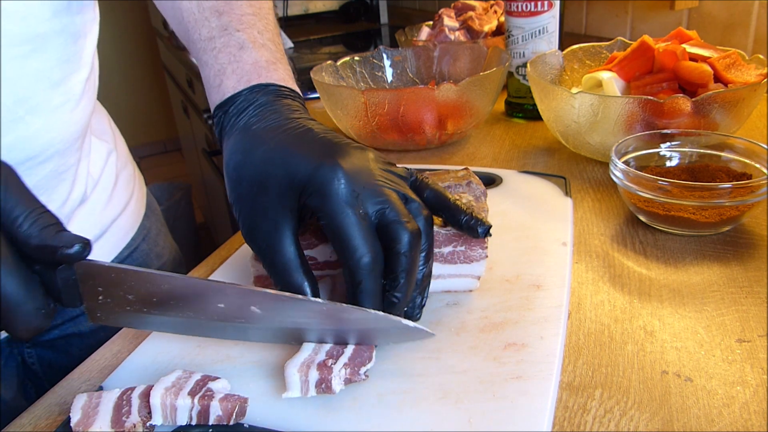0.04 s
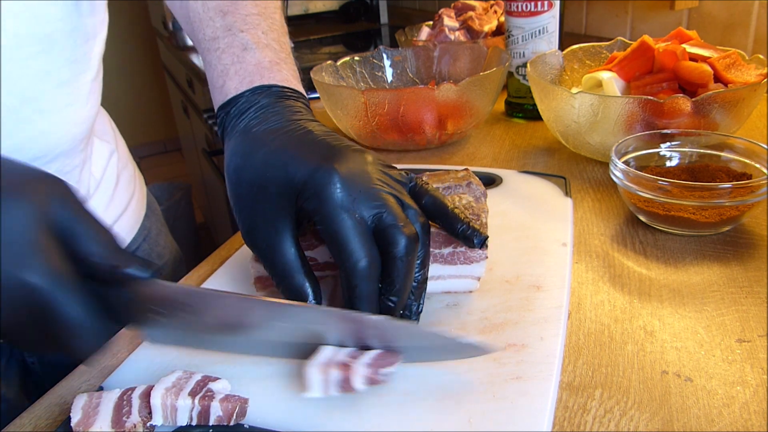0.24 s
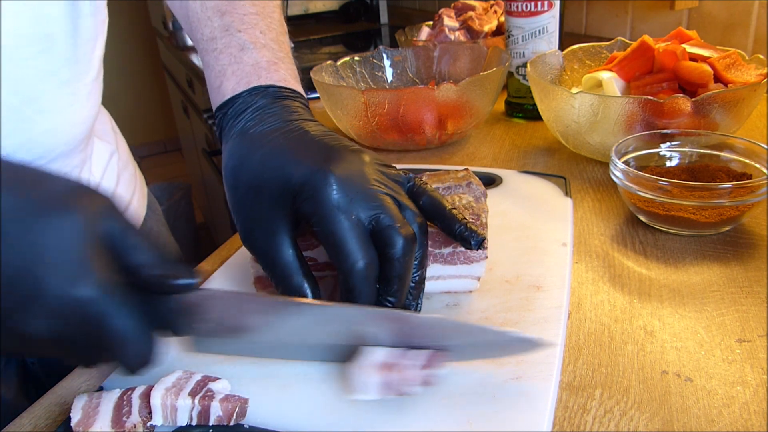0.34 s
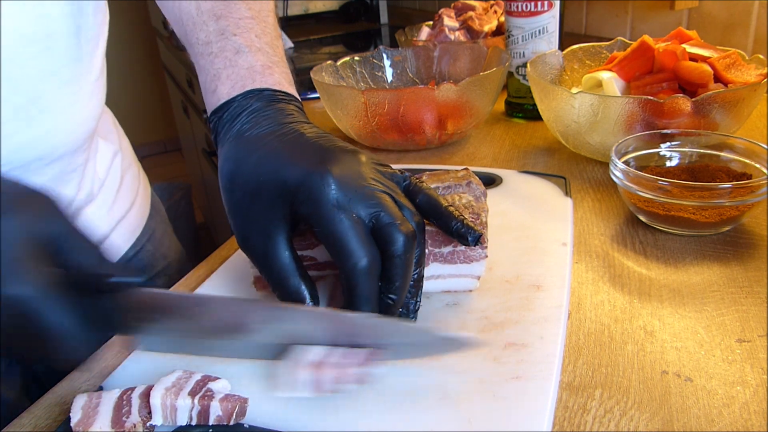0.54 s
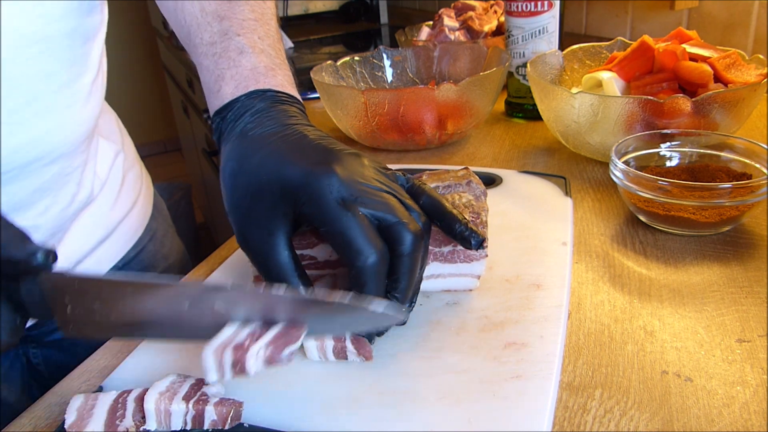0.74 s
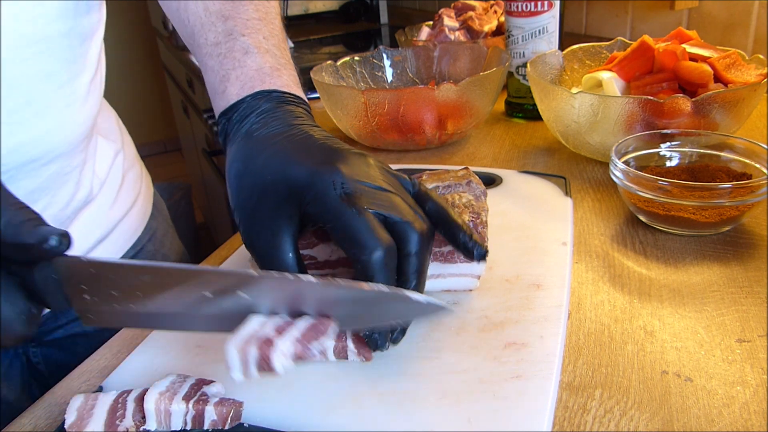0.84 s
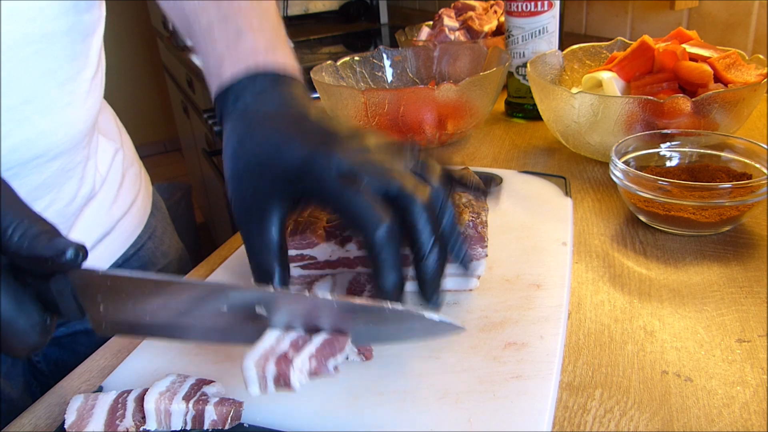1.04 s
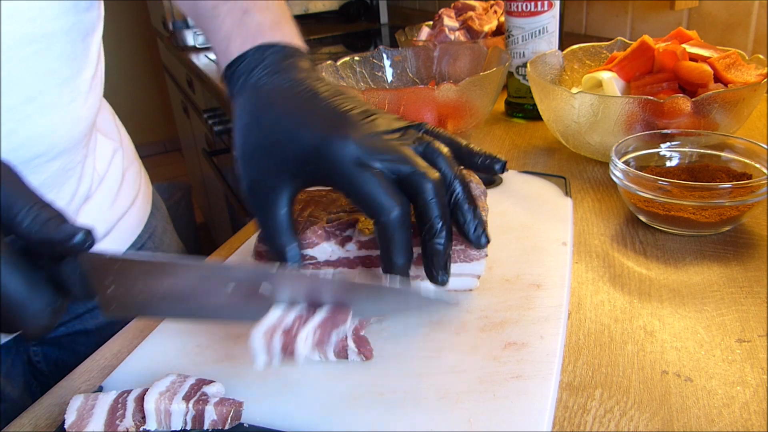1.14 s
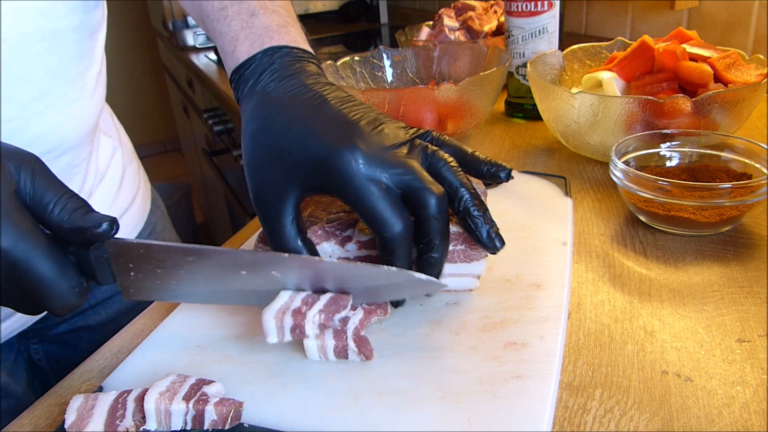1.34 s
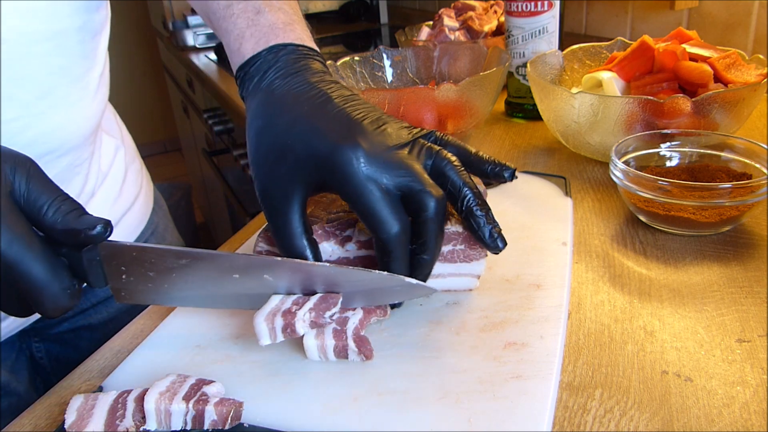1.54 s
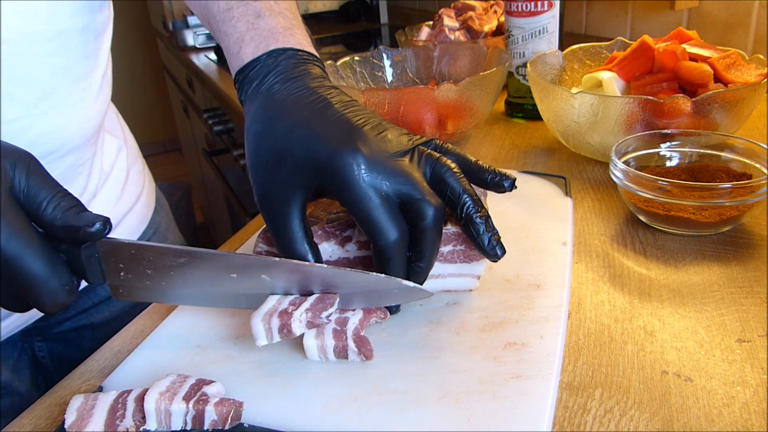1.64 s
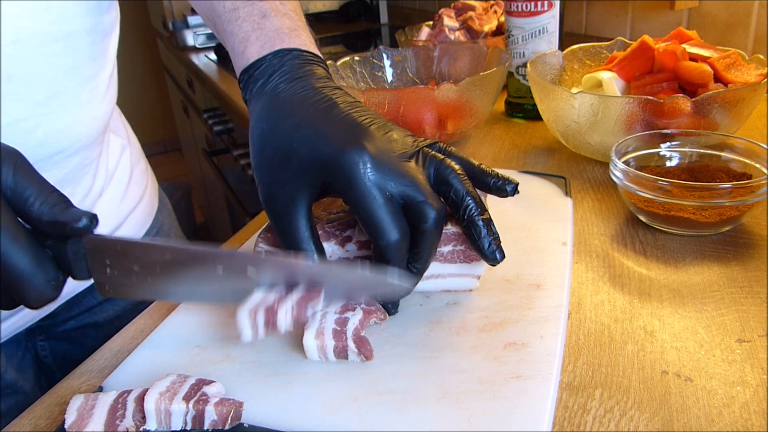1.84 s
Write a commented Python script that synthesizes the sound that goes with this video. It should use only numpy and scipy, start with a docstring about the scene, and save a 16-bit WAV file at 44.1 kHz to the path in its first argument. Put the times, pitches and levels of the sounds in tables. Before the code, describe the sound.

A knife rasps through bacon against a plastic cutting board, one push and one pull.

```python
"""A long knife rasps through a slab of bacon on a plastic cutting board: one push, one pull back.
The edge slips on the board in tiny grains that set board and blade ringing, with short squeaks
and a thin gliding whistle. The slice comes away with sticky ticks, then blade and gloved fingers
shift softly on the meat. Behind it all a refrigerator buzzes in the hush of a small kitchen."""
import sys
import numpy as np
from scipy import signal
from scipy.fft import rfft, irfft, next_fast_len
from scipy.io import wavfile

SR = 44100
rng = np.random.default_rng(int(sys.argv[2]) if len(sys.argv) > 2 else 0)


def digitize_waveform(pressure):
    """Quantize a signal to 16-bit integers and store it at the path in sys.argv[1].

    Rows of a 2-D input are taken as channels; values are limited to [-1, 1].
    """
    field = np.atleast_2d(pressure).T
    bounded = np.clip(field, -1, 1)
    quanta = np.round(bounded * 32767).astype(np.int16)
    wavfile.write(sys.argv[1], SR, quanta)


N = 83790
T = np.arange(N) / SR


def knife():
    """The cut, placed in the room: rasping strokes with the catches, ring and whistles of the edge."""
    cutting = push_and_pull() + catches() + blade_ring() + whistles()
    return kitchen(cutting, near_db=-2.5, room_db=-6)


# envelopes of the two strokes; each band rides on the overall level, ahead of its trim:
# (time [s], level [dB], bass offset [dB], low-mid offset [dB], treble offset [dB])
PUSH_ENVELOPE = [(0.15, -62, -17, -14, -11), (0.17, -66.5, -15, -12, 6.5), (0.232, -54, -7.5, 8, -1.5),
                 (0.342, -37, -11, -2.5, -8), (0.362, -40, -17.5, -5.5, -8.5),
                 (0.44, -38.5, -23.5, -5.5, -7), (0.476, -41.5, -23.5, -2, -13.5), (0.502, -58.5, 0, 2, 1),
                 (0.52, -60, -19, -10, 3)]
PULL_ENVELOPE = [(0.51, -64, -3, -16, -11), (0.53, -49, -5, -26, -7.5), (0.572, -40, -26, -11.5, -5.5),
                 (0.6, -36.5, -20, -10, -5.5), (0.638, -37.5, -22, -6, -5), (0.696, -39, -30, -10, -10),
                 (0.726, -44.5, -14, -1.5, -9.5), (0.78, -63, 1, -3, -0.5), (0.8, -62, -7, -3, -15)]
# EQ of each stroke's rasp and hiss: (frequency [Hz], gain [dB])
PUSH_RASP_EQ = [(650, -45), (1100, -6.5), (1550, 3), (2000, 0.5), (2400, 0), (3200, -4), (3900, -3.5),
                (5700, -7), (8100, -13), (11000, -19), (13000, -22.5), (15000, -38)]
PULL_RASP_EQ = [(650, -24), (1100, -8), (1800, -2), (2150, -7), (2500, -5), (3300, -8), (4200, -6.5),
                (6400, -13), (8400, -14), (11000, -19.5), (13000, -26), (15000, -50)]
# EQ of each stroke's low-mid body: (frequency [Hz], gain [dB])
PUSH_BODY_EQ = [(330, -32.5), (520, -7.5), (690, -6), (830, -9), (1150, -8), (1600, -16.5)]
PULL_BODY_EQ = [(330, -19), (520, -0.5), (680, -7.5), (900, 1), (1100, 0), (1600, -20)]

def push_and_pull():
    """The edge scrapes forward over the board, then back, each way with its own tone and band trims."""
    push = stroke(PUSH_ENVELOPE, PUSH_RASP_EQ, PUSH_BODY_EQ,
                  rasp_db=-1.5, bass_db=-1, body_db=-9, hiss_db=-0.05)
    pull = stroke(PULL_ENVELOPE, PULL_RASP_EQ, PULL_BODY_EQ,
                  rasp_db=0.45, bass_db=-10, body_db=-1.9, hiss_db=-0.6)
    return push + pull


# EQ of the low end of both strokes: (frequency [Hz], gain [dB])
STROKE_BASS_EQ = [(60, -36), (170, -1.5), (280, 3.5), (400, -6.5), (520, 4), (750, -34)]

def stroke(envelope, rasp_eq, body_eq, rasp_db, bass_db, body_db, hiss_db):
    """One pass of the knife in four bands: the lows stand for pressure, the treble for speed."""
    crossover_hz = 6500
    level, lows, mids, treble = in_time(envelope)
    scrape = cut(colour(slipping(), rasp_eq), 1080, "high")
    rasp = from_db(rasp_db) * rms_one(cut(scrape, crossover_hz, "low"))
    sharpest_slips = colour(board_and_blade(grains(per_s=5000, spread_db=0.5)), rasp_eq)
    hiss = from_db(treble + hiss_db) * rms_one(cut(sharpest_slips, crossover_hz, "high"))
    bass = from_db(lows + bass_db) * rms_one(cut(colour(slipping(), STROKE_BASS_EQ), 820, "low"))
    body = from_db(mids + body_db) * rms_one(cut(colour(slipping(), body_eq), 1470, "low"))
    return gate(envelope) * from_db(level) * (rasp + hiss + bass + body)


SLIPS_PER_S, SLIP_SPREAD_DB = 9000, 3

def slipping():
    """The edge slips over the board in dense grains that set board and blade ringing."""
    slips = grains(SLIPS_PER_S, SLIP_SPREAD_DB)
    judder_db = 0.03 * drift(rate_hz=87)
    return board_and_blade(slips * from_db(judder_db))


# resonances of board and blade: (frequency [Hz], width [Hz], gain [dB])
CONTACT_MODES = [(333, 15, 3.5), (689, 32, 10.5), (928, 14, 10), (1042, 22, 4.5), (1170, 35, 7),
                 (1426, 19, 8), (1540, 21, 4.5), (1795, 40, 0), (1752, 19, 9), (2020, 21, -2.5),
                 (2359, 24, 6.5), (2640, 13, 10), (3010, 15, 7.5), (3894, 290, 4), (4634, 15, 7.5),
                 (5830, 13, -12), (8360, 81, -7), (10500, 380, 3.5)]

def board_and_blade(drive):
    """Board and blade lend their resonances to what happens at the edge."""
    return resonate(drive, CONTACT_MODES)


# snags of the edge: (time [s], relative level [dB])
CATCH_HITS = [(0.2555, -17), (0.3390, -19.5), (0.3842, -15.5), (0.5246, -25)]
# EQ of a snag: (frequency [Hz], gain [dB])
CATCH_EQ = [(100, -26), (300, -15), (650, 12), (1000, 5.5), (1600, -12), (4000, 5.5), (10000, -25),
            (15000, -24)]

def catches():
    """The edge catches on the board, and each jolt knocks board and blade."""
    jolts = colour(snaps(CATCH_HITS, t60_s=0.0078), CATCH_EQ)
    return from_db(-20.5) * board_and_blade(jolts)


# envelope of the blade's ring as the push runs out: (time [s], level [dB])
RING_ENVELOPE = [(0.37, -63), (0.405, -43.5), (0.435, -45), (0.45, -50.5), (0.48, -53), (0.51, -59.5),
                 (0.54, -50.5), (0.57, -51)]

def blade_ring():
    """Slips excite the blade's flex resonance as it slows and turns."""
    centre_hz, width_hz = 1550, 110
    edges_hz = [centre_hz - width_hz / 2, centre_hz + width_hz / 2]
    band = signal.butter(2, edges_hz, "band", fs=SR, output="sos")
    ring = rms_one(signal.sosfilt(band, grains(SLIPS_PER_S, SLIP_SPREAD_DB)))
    db, = in_time(RING_ENVELOPE)
    return gate(RING_ENVELOPE) * from_db(db) * ring


# whistles gliding with blade speed, one curve each:
# (time [s], pitch [Hz], level [dB], jitter [share of pitch])
WHISTLE_GLIDES = [
    [(0.16, 6250, -84, 0.007), (0.185, 7000, -58, .005), (0.21, 7650, -56, 0.0058),
     (0.235, 7840, -57, 0.006), (0.268, 7720, -56, 0.017), (0.31, 8400, -51.5, 0.047),
     (0.345, 8660, -51.5, 0.077)],
    [(0.37, 8000, -48, 0.086), (0.40, 7550, -65, 0.045), (0.455, 6880, -51, 0.009),
     (0.495, 6460, -55, 0.0065), (0.54, 6350, -61, .01)],
    [(0.185, 10140, -73, 0.0045), (0.215, 10700, -62, .008), (0.25, 11100, -62, .009),
     (0.28, 11130, -57, 0.025)],
    [(0.59, 8230, -46.5, 0.045), (0.64, 8400, -51, 0.04), (0.68, 8500, -53, 0.027)],
]

def whistles():
    """The fine teeth of the edge sing thin, fluttering tones that break up under pressure."""
    out = 0
    for glide in WHISTLE_GLIDES:
        hz, db, jitter = in_time(glide)
        tone = sine(hz * (1 + jitter * drift(rate_hz=593)))
        flutter_db = 4 * drift(rate_hz=90)
        out += gate(glide, fade_s=0.013) * from_db(db + flutter_db) * tone
    return out


# squeaks of board and blade within the strokes: (time [s], half length [s], pitch [Hz], level [dB])
SQUEAK_CUES = [(0.337, 0.025, 670, -45.5), (0.388, 0.033, 335, -53), (0.437, 0.019, 1730, -42.5),
               (0.573, 0.022, 678, -47), (0.588, 0.014, 2330, -39.5), (0.592, 0.018, 825, -47),
               (0.625, 0.034, 1819, -42), (0.626, 0.022, 946, -44), (0.662, 0.011, 2592, -44),
               (0.666, 0.017, 666, -44), (0.683, 0.017, 2030, -43.5), (0.698, 0.029, 1034, -47),
               (0.612, 0.016, 4610, -42.5)]

def squeaks():
    """The dragging edge locks briefly onto one resonance after another; each swells, wavers, lets go."""
    out = 0
    for s, half_s, hz, db in SQUEAK_CUES:
        waver_hz = 16 * drift(rate_hz=165)
        roughness_db = 1.5 * drift(rate_hz=165)
        out += from_db(db + roughness_db) * swell(s, half_s) * sine(hz + waver_hz)
    return kitchen(out, near_db=-15, room_db=-5)


# sticky ticks as the slice comes away: (time [s], relative level [dB], peak frequency [Hz])
TICK_HITS = [(0.8533, -34.5, 6000), (0.8587, -31, 7500), (0.8592, -28, 7000), (0.8597, -33.5, 4200),
             (0.8620, -31.5, 4500), (0.8650, -37, 9200), (0.8690, -38, 7000), (0.9176, -29.5, 10700),
             (0.9180, -32, 4300), (0.9245, -38, 9800)]
# EQ shared by the ticks: (frequency [Hz], gain [dB])
TICK_EQ = [(300, -21), (2300, -13), (3400, 1), (4500, 2), (6000, -1.5), (9500, -1), (11500, -5),
           (13000, -12), (15500, -16)]

def slice_ticks():
    """Fat unsticks from the blade in small wet ticks, each a tearing burst with a pitch of its own."""
    out = 0
    for s, db, hz in TICK_HITS:
        tear = snaps([(s, db)], t60_s=0.0023) + 1e-18
        out += tear + from_db(5) * band_pass(tear, hz, q=1.8)
    return kitchen(from_db(-11) * colour(out, TICK_EQ), near_db=0.5, room_db=0.5)


# touches of the blade after the cut: (time [s], half length [s], centre frequency [Hz], level [dB])
NUDGE_CUES = [(1.087, 0.0092, 1000, -62), (1.144, 0.016, 8600, -59.5), (1.232, 0.01, 1750, -64.5),
              (1.25, 0.01, 11000, -68), (1.538, 0.021, 950, -67), (1.576, 0.031, 11300, -67)]

def nudges():
    """The blade settles against the meat with soft pats and wet squelches, each a cloud of grains."""
    out = 0
    for s, half_s, hz, db in NUDGE_CUES:
        cloud = band_pass(grains(per_s=3300, spread_db=SLIP_SPREAD_DB), hz, q=3.3)
        out += from_db(db) * swell(s, half_s) * rms_one(cloud)
    return kitchen(out, near_db=-6, room_db=-2.5)


# glove and blade shifting on the meat: (time [s], rub level [dB], relative crackle level [dB])
HANDLING_ENVELOPE = [(0.95, -61, -72), (0.998, -73.5, -63.5), (1.062, -67.5, -68.5), (1.086, -63.5, -62.5),
                     (1.15, -63, -64), (1.222, -70, -64), (1.248, -66.5, -61), (1.328, -73, -70.5),
                     (1.455, -63, -65.5), (1.538, -66.5, -70), (1.554, -67, -64), (1.662, -69, -73),
                     (1.684, -66.5, -62), (1.73, -66, -70), (1.748, -63, -64.5), (1.89, -61, -59)]
# EQ of the soft rub and of the moist crackle: (frequency [Hz], gain [dB])
RUB_EQ = [(300, -1.5), (900, 0.5), (1500, 2.5), (2100, 6.5), (2800, -3), (3600, 1.5), (5000, 6),
          (6500, 0.5), (9000, -38)]
CRACKLE_EQ = [(3000, -5.5), (5500, 3.5), (7000, 6), (9000, 6.5), (12000, -1), (15500, -20)]
# faint ring of the free blade resting in the meat: (frequency [Hz], width [Hz], gain [dB])
FREE_BLADE_MODES = [(852, 65, 10.5), (1334, 15, 10), (2126, 35, 5.5), (3064, 38, 9), (3474, 47, 9),
                    (4950, 150, 0.5), (5650, 50, 3)]

def handling():
    """Glove and faintly ringing blade rub on the moist meat, which crackles."""
    cutting_db = -65  # held through the cut, until the envelope takes over
    cutting = T < HANDLING_ENVELOPE[0][0]
    rub_db, crackle_db = [np.where(cutting, cutting_db, db) for db in in_time(HANDLING_ENVELOPE)]
    friction = colour(grains(per_s=5000, spread_db=1.5), RUB_EQ)
    rub = from_db(rub_db) * rms_one(resonate(friction, FREE_BLADE_MODES))
    crackle = from_db(crackle_db - 2.5) * colour(grains(per_s=2500, spread_db=0.5), CRACKLE_EQ)
    return kitchen(rub + crackle, near_db=-6, room_db=-6)


# EQ of the refrigerator's casing: (frequency [Hz], gain [dB])
CASING_EQ = [(100, -37.5), (250, -9), (380, -7), (490, -4.5), (560, -4.5), (655, -1.5), (760, -2.5),
             (900, -15), (1500, -21.5), (3000, -25)]
# its steady hum and whine: (pitch [Hz], level [dB])
HUM_TONES = [(246, -76.5), (440, -78), (489, -74), (587, -70), (635, -70.5), (2153, -77.5), (4861, -72)]

def refrigerator():
    """The compressor knocks and rattles its casing once a turn, over a few steady tones."""
    turn_hz, rattle_t60_s = 48.85, 0.024
    since_knock_s = T * turn_hz % 1 / turn_hz
    knocks = rms_one(1.0 * (np.diff(since_knock_s, prepend=0) < 0))
    decay = from_db(-60 * since_knock_s / rattle_t60_s)
    rattle = 0.95 * rms_one(rng.standard_normal((2, N)) * decay)
    shaking = stereo(rattle + knocks * [[0], [1]], likeness=-0.62)  # knocks in the side signal only
    buzz = from_db(-59) * rms_one(cut(colour(shaking, CASING_EQ), 2540, "low"))
    hum = 0
    for hz, db in HUM_TONES:
        phase = 2 * np.pi * (hz * T + rng.random((2, 1))) + 0.29 * drift(rate_hz=14)
        hum += from_db(db) * np.sqrt(2) * np.sin(phase)
    return buzz + hum


# EQ of the room tone: (frequency [Hz], gain [dB])
AIR_EQ = [(25, -9), (33, 3), (60, -24), (100, -4.5), (140, -10.5), (250, -5.5), (380, -11), (600, -7),
          (950, -7.5), (1400, -10.5), (2100, -17.5), (3200, -17.5), (4900, -22), (6500, -22),
          (10000, -19.5), (15500, -26.5)]
# its stereo image: (frequency [Hz], left-right likeness [-1..1])
AIR_IMAGE = [(60, 0.6), (120, 0.6), (240, -0.27), (500, 0.7), (950, -0.24), (1900, 0.08), (4000, -0.3),
             (15000, 0.2)]

def air():
    """Steady hush of the room, wide in some bands and narrow in others."""
    hush = cut(colour(rng.standard_normal((2, N)), AIR_EQ), 28, "high")
    spectrum = stereo(rfft(hush), at_bins(AIR_IMAGE, N))
    return from_db(-60.5) * rms_one(irfft(spectrum, N))


# EQ of the kitchen's reverb: (frequency [Hz], gain [dB])
REVERB_EQ = [(100, 1.5), (300, -1.5), (900, 7), (1900, -3.5), (4000, 0.5), (8000, 2), (15000, 3)]

def kitchen(x, near_db, room_db):
    """Direct sound, quick reflections from worktop and bowls, and the room's tail."""
    near_t60_s, room_t60_s, build_s = 0.071, 0.28, 0.0013
    t = T[:SR // 2]
    attack = 1 - np.exp(-t / build_s)
    reflections = 0
    for db, t60_s in (near_db, near_t60_s), (room_db, room_t60_s):
        envelope = attack * from_db(-60 * t / t60_s)
        reflections += from_db(db) * rms_one(rng.standard_normal((2, len(t))) * envelope)
    response = colour(stereo(reflections, likeness=0.025), REVERB_EQ) / np.sqrt(len(t))
    return x + signal.fftconvolve(x[None], response, axes=1)[:, :N]


def grains(per_s, spread_db):
    """Random clicks of uneven size, rms 1."""
    sizes = from_db(spread_db * np.minimum(rng.exponential(1, N), 4))
    signs = rng.choice([-1, 1], N)
    return rms_one(sizes * signs * (rng.random(N) < per_s / SR))


def snaps(hits, t60_s):
    """A very short burst of noise at each (time [s], level [dB])."""
    envelope = sum(from_db(db - 60 * np.maximum(T - s, 0) / t60_s) * (T >= s) for s, db in hits)
    return envelope * rng.choice([-1, 1], N)


def sine(hz):
    """An oscillator that follows a pitch curve."""
    return np.sin(2 * np.pi * np.cumsum(hz) / SR)


def drift(rate_hz):
    """Smooth random modulation, rms 1."""
    pole = np.exp(-2 * np.pi * rate_hz / SR)
    wander = signal.lfilter([1], [1, -2 * pole, pole * pole], rng.standard_normal(2 * N))
    return rms_one(wander[N:])


def swell(s, half_s):
    """A smooth rise and fall around one moment."""
    return np.exp(-((T - s) / half_s) ** 2)


def gate(curve, fade_s=0.004):
    """Open while a curve lasts, fading outside it."""
    outside_s = np.maximum(0, np.maximum(curve[0][0] - T, T - curve[-1][0]))
    return np.exp(-outside_s / fade_s)


def in_time(curve):
    """Columns of a curve at every sample."""
    times, *columns = np.transpose(curve)
    return [np.interp(T, times, column) for column in columns]


def resonate(x, modes):
    """A body lifts or dips a narrow band of whatever drives it at each of its modes."""
    out = x.copy()
    for hz, width_hz, gain_db in modes:
        radius = np.exp(-np.pi * width_hz / SR)
        gain = (from_db(gain_db) - 1) * (1 - radius ** 2) / 2
        feedback = [1, -2 * radius * np.cos(2 * np.pi * hz / SR), radius ** 2]
        out += signal.lfilter([gain, 0, -gain], feedback, x + 1e-18)
    return out


def colour(x, eq):
    """Causal (minimum-phase) EQ, scaled to keep the power of white noise."""
    size = 2 * next_fast_len(N)
    gains = rms_one(from_db(at_bins(eq, size)))
    cepstrum = irfft(np.log(gains))
    cepstrum[1:size // 2] *= 2
    cepstrum[size // 2 + 1:] = 0
    return irfft(rfft(x, size) * np.exp(rfft(cepstrum)))[..., :x.shape[-1]]


def at_bins(points, size):
    """A table over log frequency, read at the bins of a transform."""
    hz, value = np.transpose(points)
    return np.interp(np.log(np.fft.rfftfreq(size, 1 / SR) + 1), np.log(hz), value)


def cut(x, hz, kind):
    """Butterworth high- or low-pass."""
    return signal.sosfilt(signal.butter(3, hz, kind, fs=SR, output="sos"), x)


def band_pass(x, hz, q):
    """One resonant band."""
    return signal.lfilter(*signal.iirpeak(hz, q, fs=SR), x)


def stereo(pair, likeness):
    """Two unrelated signals, as mid and side, become left and right of a given likeness."""
    mid = np.sqrt(1 + likeness) * pair[0]
    side = np.sqrt(1 - likeness) * pair[1]
    return np.array([mid + side, mid - side]) / np.sqrt(2)


def from_db(db):
    """Decibels to gain."""
    return 10 ** (np.asarray(db) / 20)


def rms_one(x):
    """Scale to unit rms."""
    return x / np.sqrt(np.mean(x ** 2) + 1e-20)


def scene():
    """Everything heard at the worktop."""
    return knife() + squeaks() + slice_ticks() + nudges() + handling() + refrigerator() + air()


def record(dry):
    """A steep low-pass takes off the very top."""
    stopband_hz = 15900
    return signal.sosfilt(signal.cheby2(16, 70, stopband_hz, fs=SR, output="sos"), dry)


dry = scene()
out = record(dry)
digitize_waveform(out)
```